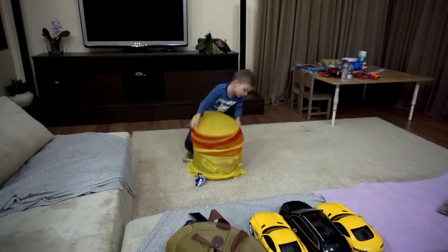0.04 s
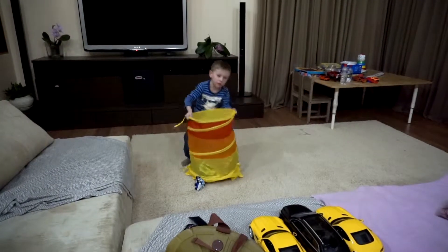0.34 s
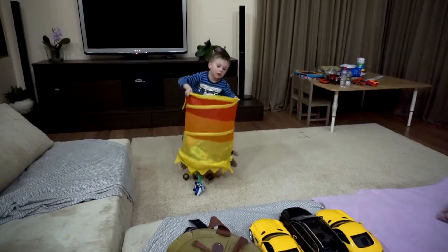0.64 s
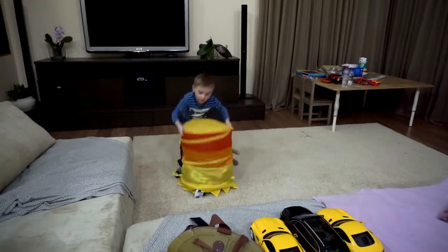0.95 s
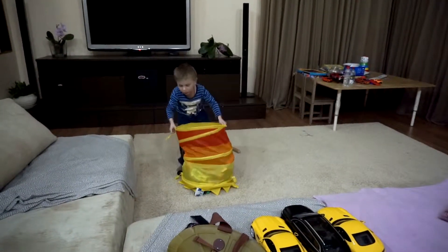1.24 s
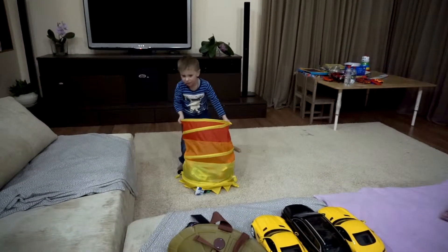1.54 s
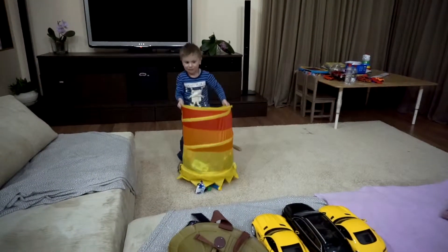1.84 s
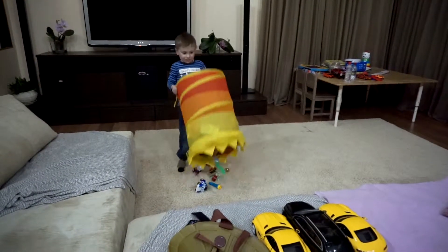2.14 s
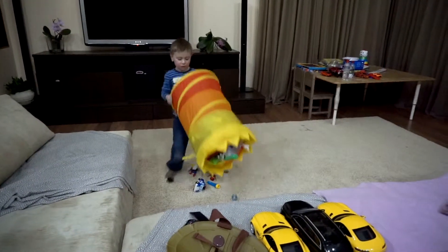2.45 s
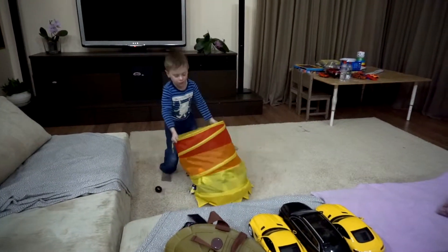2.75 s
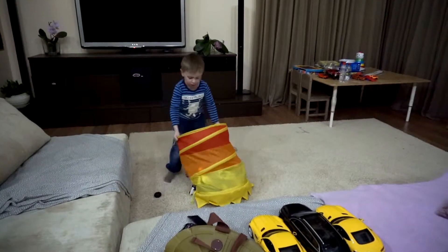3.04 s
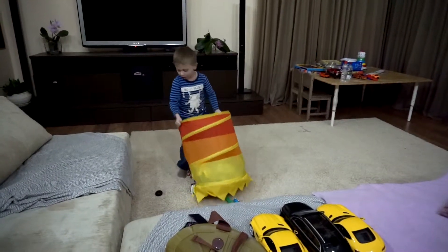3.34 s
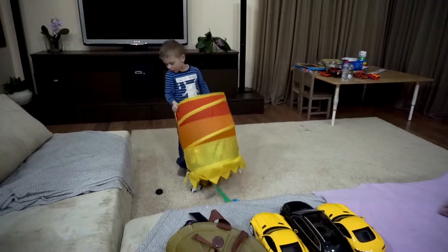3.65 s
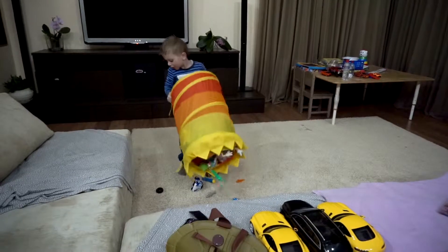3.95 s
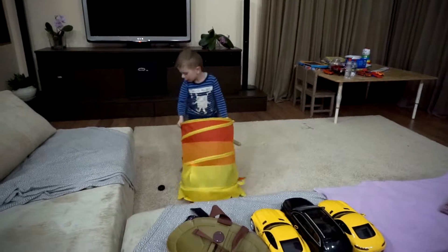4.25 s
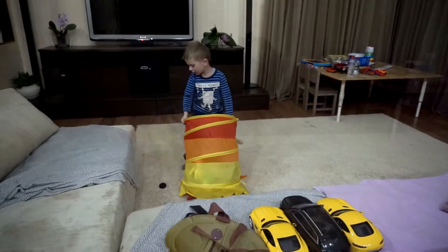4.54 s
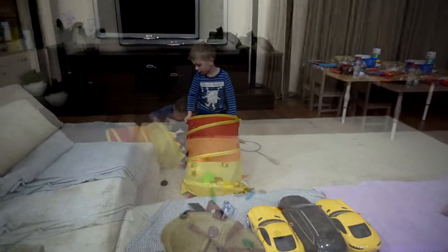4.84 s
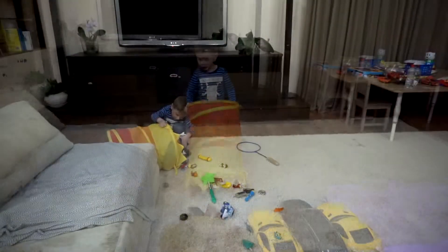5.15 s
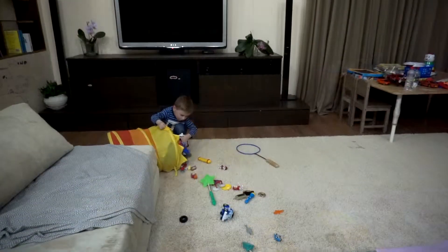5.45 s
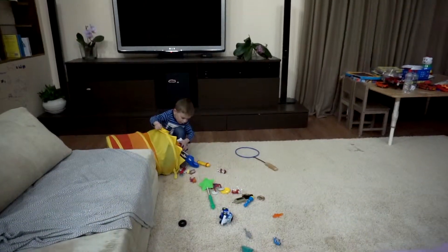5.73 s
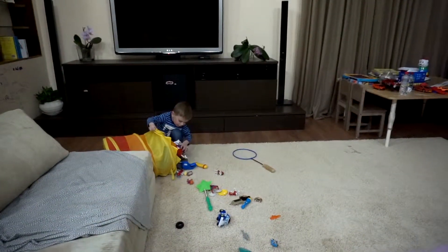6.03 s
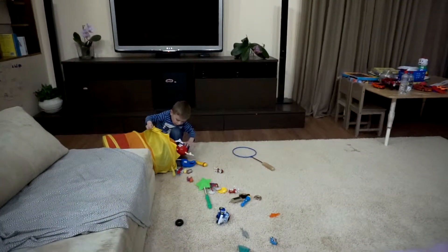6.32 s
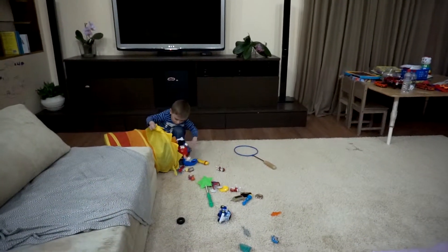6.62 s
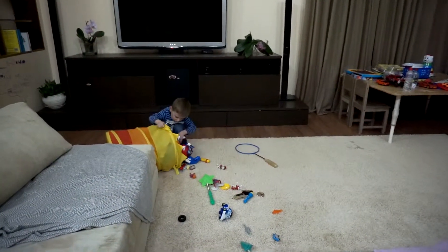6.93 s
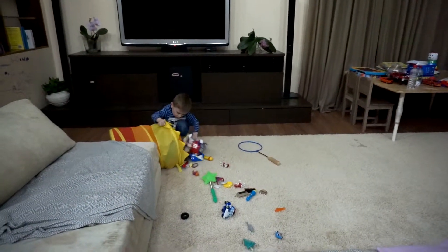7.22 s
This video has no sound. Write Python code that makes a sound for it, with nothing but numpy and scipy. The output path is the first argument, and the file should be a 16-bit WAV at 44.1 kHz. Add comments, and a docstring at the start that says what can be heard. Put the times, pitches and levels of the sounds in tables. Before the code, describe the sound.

A sudden burst of plastic clatter and crinkling cloth opens the sound as small hollow toys are shaken inside a fabric tunnel. They slide again around 0.5 seconds, and another loud jolt comes at 1 second. After a short lull, a softer rattle swells near 2 seconds. At about 2.7 seconds the toys drop hard, with sharp cracks, snapping cloth and dull thuds on the carpet. More rattling follows from 3.4 to 3.8 seconds, then a last loud dump at 4.2 seconds settles away. From about 5.2 seconds to the end near 7.5 seconds, there is quieter rummaging: light rustles, small slides and single toys clicking together, clustered around 5.6, 6 to 6.3, 6.7 and 7.3 seconds. Everything is heard from a few metres away in an echoing living room, with little bass and a faint steady hiss underneath.

```python
"""A burst of plastic clatter and crinkling cloth: a child shakes small toys out of a fabric tunnel
onto a carpet, a few metres away in an echoing living room. Hollow shells crack and ring as they
collide, stiff creases crackle, hard drops thud. Jolts rise fast and settle, slides swell and ebb;
then the child rummages in the tunnel's mouth and single toys knock together."""
import sys
import numpy as np
from scipy import signal
from scipy.fft import rfft, irfft
from scipy.io import wavfile
from scipy.ndimage import map_coordinates

SR = 44100
rng = np.random.default_rng(int(sys.argv[2]) if len(sys.argv) > 2 else 0)


def unload_audio(sound):
    """Save the sound as a 16-bit wav file, at the path given as the first command line argument."""
    columns = np.transpose(np.atleast_2d(sound))
    # keep every value between -1 and 1, then stretch to whole-number steps
    steps = np.round(np.clip(columns, -1, 1) * 32767)
    wavfile.write(sys.argv[1], SR, steps.astype(np.int16))


N = 321048

# tunnel jerked or dumped: (time [s], clatter [dB], crinkle [dB], attack [s], settling [s])
TUNNEL_JOLTS = [(-.012, -18.5, -23, 0.006, 0.556), (.935, -18.5, -26.5, 0.0346, 0.337),
                (1.745, -31, -49.5, 0.0094, 0.33), (2.661, -17.5, -24.5, .007, .51),
                (3.493, -23.5, -34.5, 0.0173, 0.294), (4.215, -18, -24.5, .009, .47),
                (5.644, -46, -40, 0.0097, 0.22), (6.722, -38, -49, 0.0117, 0.444)]
# tunnel lifted or rummaged in: (peak time [s], half length [s], clatter [dB], crinkle [dB])
TOY_SLIDES = [(0.493, 0.1664, -25.5, -36.5), (0.796, 0.196, -34, -45), (1.957, 0.1244, -28.5, -42),
              (2.337, .17, -39, -52.5), (2.565, 0.0729, -27.5, -38), (3.12, .12, -51, -59),
              (3.45, 0.1064, -31.5, -48), (3.697, 0.12, -27, -42), (4.111, 0.153, -34.5, -50),
              (5.204, 0.0766, -36.5, -51), (5.554, 0.118, -43.5, -55.5), (5.849, 0.11, -52, -62),
              (6.068, 0.0526, -47, -46.5), (6.28, 0.123, -39.5, -53.5), (6.583, 0.123, -52, -77.5),
              (7.001, 0.081, -50.5, -58), (7.272, 0.119, -44.5, -61)]
# single toys knocking: (time [s], level [dB], lowest mode [Hz], crack re ring [dB])
TOY_KNOCKS = [(.022, 1, 680, -8), (.086, 5.5, 1928, 0.5), (.203, 1, 1135, -4), (.365, -.5, 2300, -2),
              (.455, 0, 1120, -6), (.608, -.5, 1152, -7), (.946, -7, 680, -5), (1.004, 4.5, 1073, -4),
              (1.077, 0, 638, -8.5), (1.752, -10.5, 1150, -11), (1.86, -12.5, 5180, -15),
              (1.905, -5, 620, -17), (2.456, -8, 580, -5.5), (2.526, -4, 1620, 8), (2.665, 7, 543.8, -9),
              (2.692, 6, 622, -15.5), (3.43, -14, 5500, -8), (3.521, 1.5, 1824, 1.5),
              (3.667, -4, 1182, -12), (4.094, -3, 1180, -11), (4.225, 4.5, 1100, 3.5),
              (4.338, -0.5, 1100, 4), (5.419, -15, 1670, -6), (5.501, -12.5, 1795, -7.5),
              (5.560, -17, 595, -6.5), (5.648, -13.5, 300, -16), (5.660, -4.5, 2002, 2.5),
              (5.860, -16, 2184, -5), (5.947, -17.5, 3990, 0), (6, -3.5, 3495, -2.5),
              (6.001, -10.5, 2640, -9), (6.097, -8.5, 1153, 2.5), (6.099, -4.5, 1900, -5),
              (6.147, -6, 630, -9), (6.186, -12, 660, -12), (6.244, -16, 274, 2), (6.300, -12, 3568, 1),
              (6.728, -10, 2733, -4), (6.734, -8.5, 754, 5), (6.739, -10, 3316, -10), (6.785, -12, 771, -6),
              (6.975, -18, 1050, 10), (7.275, -13.5, 2000, 5.5)]
# sharp, bright ticks, probably stiff cloth snapping: (time [s], relative level [dB])
SHARP_TICKS = [(0.0276, -16), (.3643, -17), (0.607, -18.5), (0.7724, -23.5), (0.871, -20.5), (1.8058, -31),
               (2.2653, -32.5), (2.4423, -27.5), (2.575, -26), (2.8029, -14), (2.9649, -24.5), (3.017, -32),
               (3.5208, -19.5), (3.6668, -17), (4.0474, -24.5), (4.5875, -26), (5.5777, -32.5),
               (5.6021, -24.5), (6.2996, -37), (6.7255, -26.5), (7.2611, -30)]
# hollow toy modes: (ratio to lowest [1], level [dB], t60 for a 1500 Hz toy [s])
SHELL_MODES = [(1, 2.5, 0.02463), (1.098, -3, 0.01856), (1.66, -8.5, 0.0129), (2.35, -9.5, 0.0216),
               (3.08, -9, 0.0079), (4.5, -25, 0.0088)]
# source spectra: (frequency [Hz], gain [dB])
HEAP_EQ = [(40, -26.5), (110, -38), (200, -20.5), (340, -7), (430, -9), (600, 2), (900, -3), (1140, 2),
           (1400, -1), (2400, -1), (3400, -9.5), (6000, -18.5), (15000, -27.5)]
CLOTH_EQ = [(100, -50), (500, -8), (2500, 8), (4500, 4.5), (7000, 2.5), (11000, 0.5), (16000, -5.5)]
CRACK_EQ = [(100, -28), (600, -14), (3000, 3.5), (6000, -7), (11000, -10.5), (16000, -19.5)]
TICK_EQ = [(300, -29), (2000, 9), (5000, 0.5), (11000, -1), (16000, -5.5)]
THUD_EQ = [(40, -3.5), (120, -20.5), (200, -9.5), (320, 3.5), (560, 0), (900, -3), (3000, -51)]
HISS_EQ = [(30, -8.5), (150, -12), (600, 1), (2500, -7), (6000, -14.5), (16000, -9.5)]
# room decay: (frequency [Hz], t60 [s])
ROOM_DECAY = [(100, 0.97), (300, 1.3949), (700, 1.485), (1800, 1.5), (4000, 1.17), (7500, 0.6852),
              (14000, 0.0016)]
# echo width: (frequency [Hz], side minus mid [dB])
ROOM_WIDTH = [(125, -24), (250, -19), (500, -13.5), (1000, -6.5), (2000, -5.5), (4000, 0.5), (8000, 2.5),
              (13000, -2.5)]
# brief level dip: (time [s], gain [dB])
LEVEL_DIP = [(5.26, 0.5), (5.39, -5), (5.44, 1.5)]


def heap_clatter(motion_db, spread_db=4.5, crack_db=-2, count=320):
    """Toys of many sizes collide, more often the harder they are shaken."""
    rate_per_s = 1700 * undb(.25 * (motion_db + 20))
    blows = contacts(rate_per_s, spread_db) * undb(motion_db)
    pitches_hz = np.geomspace(300, 7000, count)
    toys = [np.sqrt(hz / pitches_hz.mean()) * shell_ring(hz) + undb(crack_db) * burst(t60_s=0.00912)
            for hz in pitches_hz]
    struck, out = rng.integers(0, count, N), np.zeros(N)
    for i in np.flatnonzero(blows):
        add(out, i / SR, blows[i] * toys[struck[i]])
    return colour(out, HEAP_EQ)


def shell_ring(lowest_hz, size=2048):
    """Modes of one hollow toy; small toys die away sooner."""
    t, out = np.arange(size) / SR, 0
    for ratio, db, t60_s in SHELL_MODES:
        hz = lowest_hz * ratio * (1 + 0.0304 * (ratio > 1) * rng.standard_normal())
        decay = fade(t, t60_s * (1500 / lowest_hz) ** 0.166)
        out += (hz < SR / 2) * undb(db) * np.cos(2 * np.pi * hz * t) * decay * rng.choice([-1, 1])
    return unit(out)


def tunnel_motion(climb_db=11, slide_edge_db=7):
    """Clatter and crinkle levels in dB: jolts and slides add in power; the cloth settles sooner."""
    t = np.arange(N) / SR
    toys, fabric = power(db=-58), power(db=-72)  # never held quite still
    for start_s, clatter_db, crinkle_db, attack_s, settling_s in TUNNEL_JOLTS:
        since_s = t - start_s - attack_s
        attack_db = climb_db * np.minimum(since_s / attack_s, 0)
        settled = lambda hold_s: np.maximum(since_s - hold_s, 0) / settling_s
        toys += power(clatter_db + attack_db - 26 * settled(hold_s=0.027) ** 1.287)
        fabric += power(crinkle_db + attack_db - 46 * settled(hold_s=0.0491) ** 0.979)
    for peak_s, half_s, clatter_db, crinkle_db in TOY_SLIDES:
        swell_db = -slide_edge_db * ((t - peak_s) / half_s) ** 2
        toys += power(clatter_db + swell_db)
        fabric += power(crinkle_db + swell_db)
    return 10 * np.log10(toys), 10 * np.log10(fabric)


def cloth_crinkle(motion_db, snap_db=-9):
    """Creases of stiff fabric: dense crackle with a few louder snaps."""
    crackle = contacts(rate_per_s=1500 * undb(0.24 * (motion_db + 44)), spread_db=5)
    snaps = undb(snap_db) * contacts(rate_per_s=25 * undb(.5 * (motion_db + 40.5)), spread_db=6)
    grain = unit(fade(np.arange(512) / SR, t60_s=0.012))
    envelope = np.sqrt(np.abs(convolve(crackle ** 2 + snaps ** 2, grain ** 2)))
    return colour(envelope * rng.standard_normal(N) * undb(motion_db), CLOTH_EQ)


def toy_knocks():
    """Single blows: shell ring plus contact crack."""
    out = np.zeros(N)
    for time_s, db, lowest_hz, crack_db in TOY_KNOCKS:
        ring = shell_ring(lowest_hz)
        crack = unit(colour(burst(t60_s=0.055), CRACK_EQ))
        add(out, time_s, undb(db) * unit(ring + undb(crack_db) * crack))
    return out


def sharp_ticks():
    """Brief bright snaps with no ring."""
    out = np.zeros(N)
    for time_s, db in SHARP_TICKS:
        add(out, time_s, undb(db) * unit(colour(burst(t60_s=0.0464), TICK_EQ)))
    return out


def carpet_thuds(motion_db, hard_db=-18, growth=2.02):
    """Pieces thud on the carpet, prominent only in hard drops."""
    impacts = contacts(rate_per_s=np.full(N, 400), spread_db=1.5)
    return colour(impacts * undb(hard_db + growth * (motion_db - hard_db)), THUD_EQ)


def direct_path(x, lag_samples=.45, tilt_db=3):
    """Straight path: sooner and brighter at the left microphone."""
    treble = signal.sosfilt(signal.butter(1, 3000, "high", fs=SR, output="sos"), x)
    left = x + (undb(tilt_db / 2) - 1) * treble
    right = x + (undb(-tilt_db / 2) - 1) * treble
    return np.array([left, map_coordinates(right, [np.arange(N) - lag_samples])])


def tumbling_echo(x, turns_per_s=9):
    """Tumbling pieces sound from four places in turn, each with its own echoes."""
    angle = 2 * np.pi * turns_per_s * np.arange(N) / SR
    places = np.arange(0, 2 * np.pi, np.pi / 2)
    return sum(room_echo(x * np.maximum(0, np.cos(angle - place))) for place in places)


def room_echo(x, build_s=0.02125, early_db=3, early_t60_s=0.242, bands=18):
    """Diffuse echo: strong early bounces, then a tail that loses treble first."""
    size = 2 * SR
    t, hz = np.arange(size) / SR, np.arange(size // 2 + 1) * SR / size
    mid, side = rfft(rng.standard_normal((2, size))) / np.sqrt(SR / 10)
    width = undb(on_log_axis(hz, ROOM_WIDTH))
    stereo = (mid + np.array([[1], [-1]]) * width * side) / np.sqrt(1 + width ** 2)
    centres_hz, tail = np.geomspace(100, 16000, bands), 0
    for centre_hz, share in zip(centres_hz, np.eye(bands)):
        band = on_log_axis(hz, np.c_[centres_hz, share])
        tail += irfft(stereo * band) * fade(t, on_log_axis(centre_hz, ROOM_DECAY))
    tail *= (1 - np.exp(-t / build_s)) * (1 + undb(early_db) * fade(t, early_t60_s))
    return np.array([convolve(x, response) for response in tail])


def hiss():
    """Steady noise of room and microphones."""
    return np.array([colour(noise, HISS_EQ) for noise in rng.standard_normal((2, N))])


def contacts(rate_per_s, spread_db):
    """Random impulses of uneven size, mean power one."""
    hits = np.flatnonzero(rng.random(N) < rate_per_s / SR)
    sizes = undb(spread_db * np.clip(rng.standard_normal(N)[hits], -2, 2))
    signs = np.sign(rng.random(N)[hits] - .5)
    out = np.zeros(N)
    out[hits] = signs * sizes / np.sqrt(np.mean(sizes ** 2) * rate_per_s[hits] / SR)
    return out


def burst(t60_s, size=2048):
    """Brief decaying noise."""
    return unit(rng.standard_normal(size) * fade(np.arange(size) / SR, t60_s))


def colour(x, eq, size=2048):
    """Minimum-phase filter from a (Hz, dB) table."""
    hz = np.arange(size // 2 + 1) * SR / size
    cepstrum = irfft(np.log(undb(on_log_axis(hz, eq))))
    cepstrum[1:size // 2] *= 2
    cepstrum[size // 2 + 1:] = 0
    return convolve(x, irfft(np.exp(rfft(cepstrum))))


def on_log_axis(hz, table):
    """Interpolate a (Hz, value) table over log frequency."""
    table_hz, values = np.transpose(table)
    return np.interp(np.log(np.maximum(hz, 1)), np.log(table_hz), values)


def undb(db):
    """Decibels to gain."""
    return 10 ** (np.asarray(db) / 20)


def power(db):
    """Decibels to power, floored."""
    return undb(np.maximum(db, -150)) ** 2


def unit(x):
    """Scale to unit energy."""
    return x / np.sqrt(np.sum(x ** 2))


def fade(t, t60_s):
    """Exponential decay, 60 dB in t60_s."""
    return np.exp(-np.log(1000) * t / t60_s)


def convolve(x, response):
    """Convolve, keeping the input length."""
    return signal.oaconvolve(x, response)[:len(x)]


def add(track, time_s, sound):
    """Mix a sound in at time_s."""
    i = int(time_s * SR)
    track[i:i + len(sound)] += sound[:N - i]


def scene():
    """The spill is heard mostly through the room; single knocks stand out."""
    clatter_db, crinkle_db = tunnel_motion()
    spill = undb(2) * heap_clatter(clatter_db) + undb(1.5) * cloth_crinkle(crinkle_db)
    spill += undb(-2.5) * carpet_thuds(clatter_db)
    knocks, ticks = toy_knocks(), undb(13) * sharp_ticks()
    direct = direct_path(undb(-2) * spill + knocks + ticks)
    echo = tumbling_echo(spill) + room_echo(undb(3.5) * knocks + undb(0.5) * ticks)
    return direct + echo + undb(-58.5) * hiss()


def record(dry, low_cut_hz=150, top_hz=16000, right_db=0.3946):
    """Small microphones lose bass, the right is slightly louder; the level dips; the top is cut."""
    thin = signal.sosfilt(signal.butter(2, low_cut_hz, "high", fs=SR, output="sos"), dry)
    dip_db = np.interp(np.arange(N) / SR, *np.transpose(LEVEL_DIP))
    gain = undb(dip_db + np.array([[-right_db], [right_db]]) / 2)
    return signal.sosfilt(signal.ellip(10, .2, 80, top_hz, fs=SR, output="sos"), thin * gain)


dry = scene()
out = record(dry)
unload_audio(out)
```